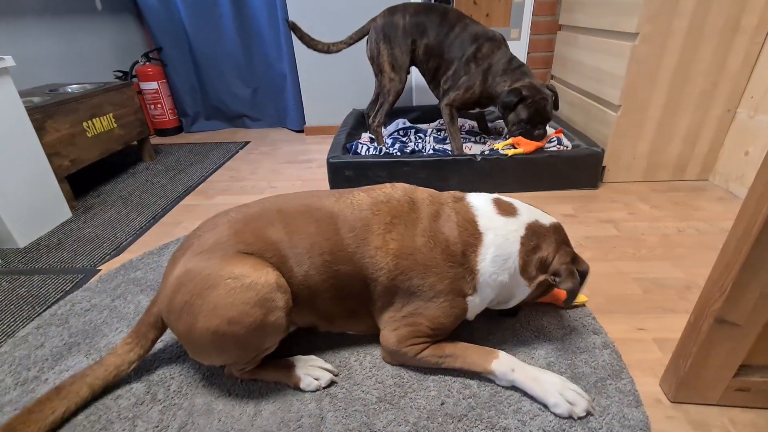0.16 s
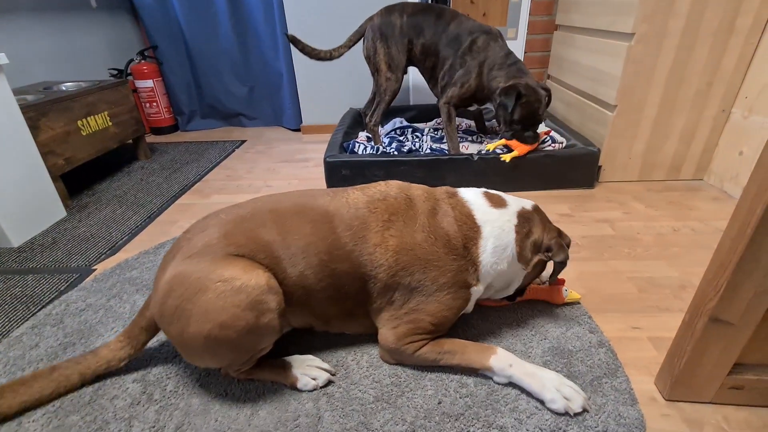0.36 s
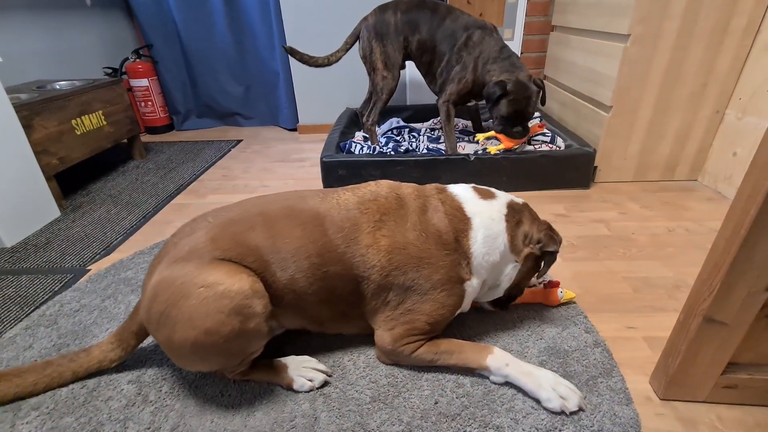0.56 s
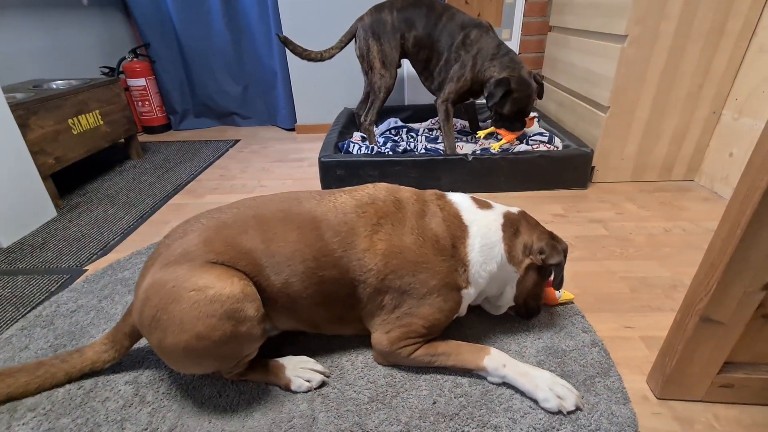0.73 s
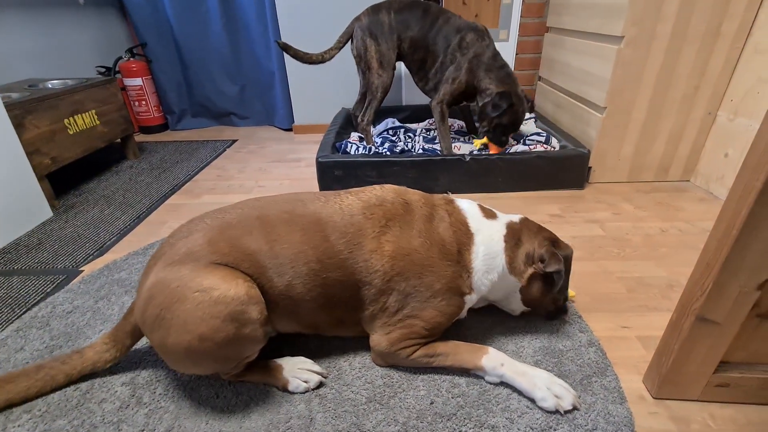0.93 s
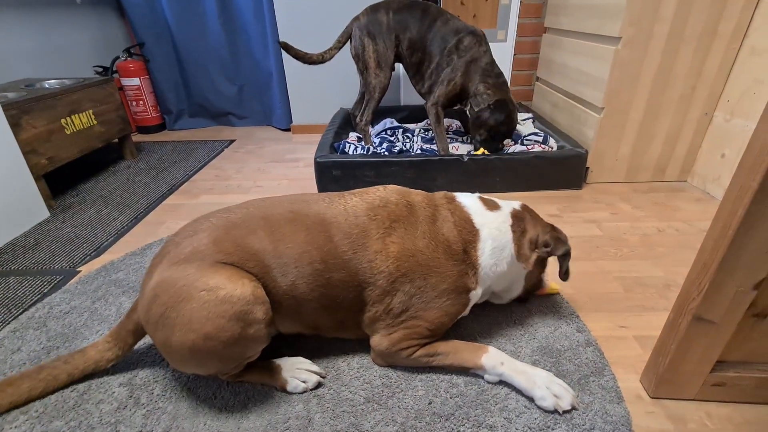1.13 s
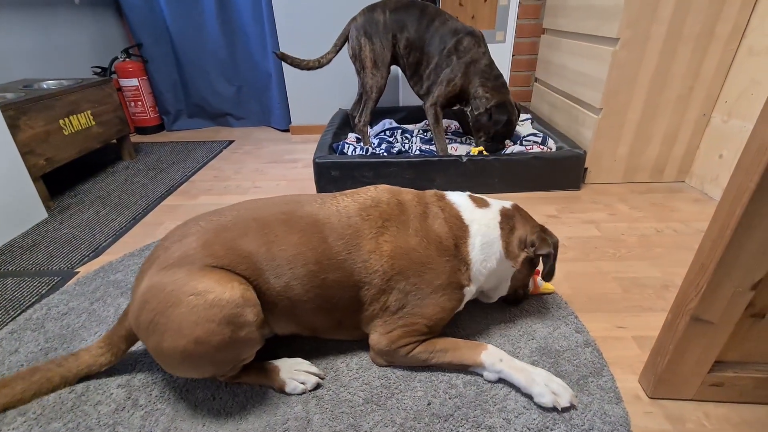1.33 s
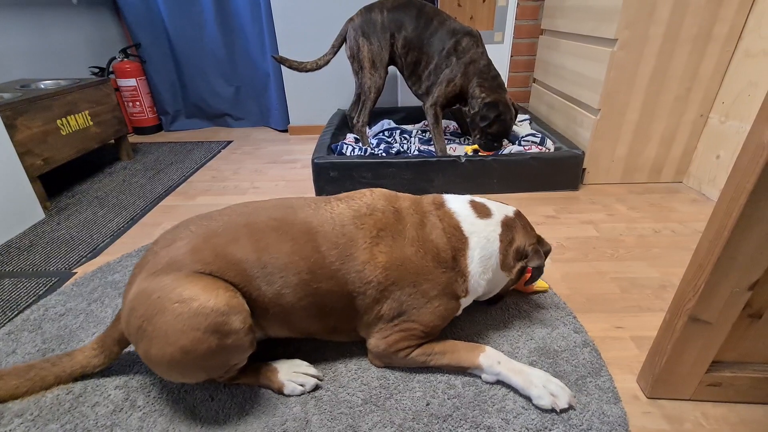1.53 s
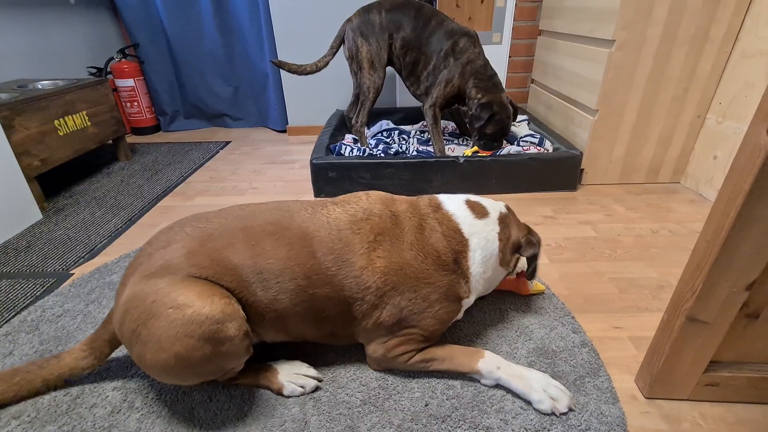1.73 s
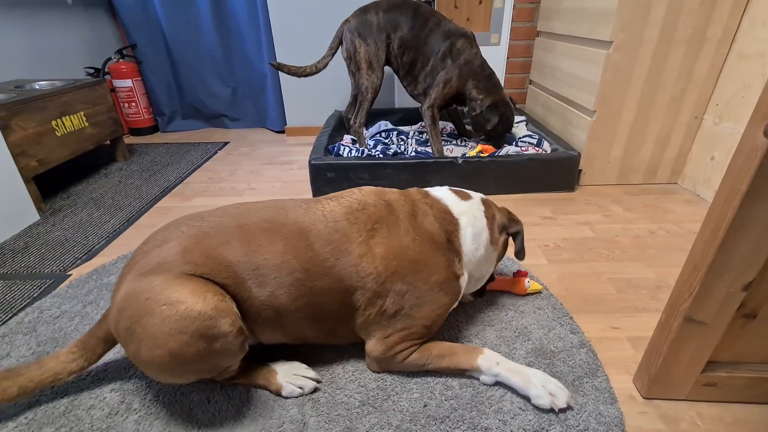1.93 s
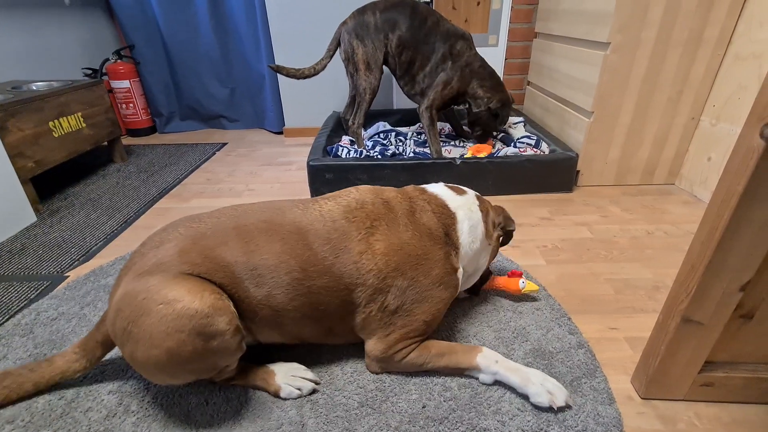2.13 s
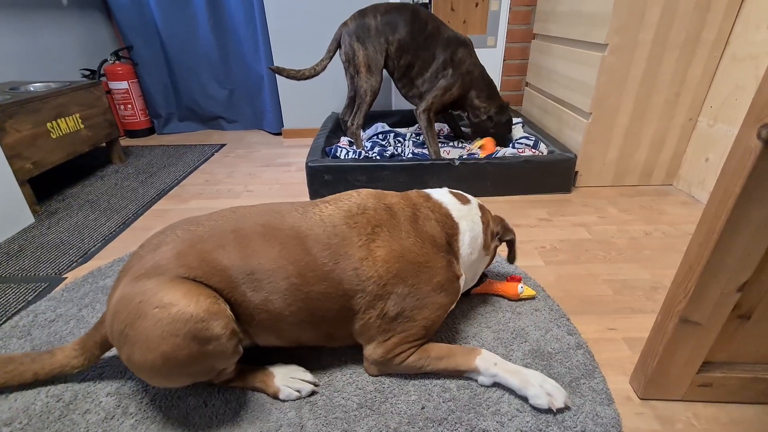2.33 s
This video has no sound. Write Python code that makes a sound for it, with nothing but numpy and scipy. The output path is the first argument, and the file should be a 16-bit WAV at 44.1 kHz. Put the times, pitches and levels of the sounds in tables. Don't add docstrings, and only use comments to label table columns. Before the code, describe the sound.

Squeaky rubber toys chewed by two dogs: a soft squeak, a loud shriek jumping registers, short dying squeaks, a second harder bite, then a faint indrawn squeak; low thumps and rubbing, close microphone, bare reverberant room.

```python
import sys
import numpy as np
from scipy import signal
from scipy.fft import rfft, irfft
from scipy.io import wavfile

SR = 44100
rng = np.random.default_rng(int(sys.argv[2]) if len(sys.argv) > 2 else 0)


def invert_db(level):
    return 10 ** (np.asarray(level, dtype=float) / 20)


def master_out(mix):
    frames = np.transpose(np.atleast_2d(mix))
    ceiling = np.clip(frames, -1, 1)
    pcm = np.round(ceiling * 32767).astype(np.int16)
    wavfile.write(sys.argv[1], SR, pcm)


N = 110250

# [t/s, f/Hz, level/dB]
SOFT_BITES = [
    [(.183, 1146, -30.5), (.225, 1171, -23.5), (.25, 1091, -32), (.272, 1022, -37.5)],
    [(1.048, 1116, -30), (1.068, 1082, -31), (1.088, 977, -38), (1.105, 1080, -56)],
    [(1.277, 1106, -40), (1.301, 1122, -36.5), (1.32, 1014, -45.5), (1.335, 950, -74)],
    [(1.959, 1121, -34.5), (1.983, 1118, -32), (2.0, 1109, -32), (2.011, 980, -46.5)],
]
REFILLS = [
    [(2.126, 1295, -46), (2.14, 1360, -28.5), (2.17, 1407, -29.5), (2.2, 1400, -25), (2.235, 1383, -29.5),
     (2.258, 1330, -29), (2.28, 1240, -38.5), (2.3, 1190, -48)],
    [(2.484, 1273, -57), (2.49, 1299, -39), (2.5, 1306, -39.5)],
]
# [t/s, f/Hz, level/dB]
BITE_1_RISE = [(.349, 1176, -37.5), (.362, 1225, -19.5), (.382, 1508, -21), (.396, 1599, -20.5),
               (.399, 1950, -18), (.413, 2355, -17), (.42, 2400, -19.5)]
BITE_1_SHRIEK = [(.42, 3253, -25.5), (.445, 3247, -24.5), (.458, 3750, -15.5), (.478, 3850, -18),
                 (.487, 4240, -22.5), (.506, 4215, -14.5), (.52, 4250, -13), (.535, 4430, -15.5),
                 (.558, 4540, -39.5)]
BITE_1_TOP = [(0.557, 5840, -33.5), (0.563, 6023, -27), (0.585, 5596, -23.5), (0.601, 5840, -27),
              (0.612, 5150, -24.5)]
BITE_1_DROP = [(.585, 4300, -31), (.596, 3400, -30), (.608, 2700, -30)]
BITE_1_SAG = [(0.611, 1870, -19), (0.627, 1738, -18.5), (0.64, 1525, -23), (.664, 1268, -26.5),
              (0.679, 1195, -28.5), (0.693, 1241, -22.5), (.712, 1521, -20.5), (0.719, 1607, -19)]
# [t/s, f/Hz, level/dB]
REBITE_CLIMB = [(0.722, 1900, -15), (.732, 1977, -18), (0.75, 2020, -27.5), (0.753, 2217, -16),
                (0.763, 2188, -22.5), (0.768, 1984, -17.5), (0.79, 2022, -20.5), (0.81, 2500, -18)]
REBITE_ARCH = [(.808, 3157, -18.5), (0.831, 3363, -23), (.865, 3383, -15.5), (0.88, 3093, -23.5),
               (0.886, 2795, -20.5), (0.895, 2671, -19.5), (0.902, 1437, -23.5), (.915, 1262, -20),
               (0.952, 1110, -40)]
# [t/s, f/Hz, level/dB]
BITE_2_RISE = [(1.398, 1140, -43), (1.418, 1214, -25.5), (1.433, 1378, -29), (1.447, 1616, -30),
               (1.466, 1550, -32)]
BITE_2_HOLD = [(1.464, 2100, -28), (1.484, 2001, -22), (1.505, 1980, -34.5), (1.521, 1994, -17.5),
               (1.533, 2143, -27), (1.547, 2370, -19)]
BITE_2_PEAK = [(1.547, 3237, -20.5), (1.561, 3117, -40), (1.569, 2997, -22.5)]
BITE_2_FALL = [(1.568, 1828, -23), (1.58, 1773, -26.5), (1.59, 1363, -25.5), (1.607, 1255, -29.5),
               (1.652, 1114, -36.5)]
LAST_ARCH = [(1.686, 1162, -29.5), (1.71, 1353, -25), (1.738, 1576, -23), (1.78, 1611, -23.5),
             (1.8, 1397, -25), (1.82, 1185, -32), (1.845, 1111, -43.5)]

# [f/Hz, level/dB]
NECK_PRESSED = [(1100, -4.5), (2000, -5), (3300, -5), (4500, 0), (5700, 2), (7300, -19), (10000, -5.5),
                (15000, -31)]
NECK_SOFT = [(1100, -8), (2200, -8.5), (3300, -4.5), (4500, 0), (5600, 3.5), (7300, -18.5), (9000, -8),
             (15000, -23)]
NECK_HIGH = [(2000, -4), (3300, -5), (4500, 3.5), (5900, 0.5), (7300, -15.5), (9000, -6), (12000, -14),
             (15000, -43)]
NECK_SLACK = [(1100, -10.5), (1800, -6.5), (3300, -6), (4500, -2), (5600, 3.5), (7300, -15), (10000, -5),
              (15000, -27)]
NECK_REFILL = [(1400, -3), (2800, -18), (4200, -23), (5500, -15.5), (7000, -28), (9500, -20.5),
               (15000, -31)]
# [f/Hz, level/dB]
AIR_COLOUR = [(1300, 0), (5500, 0), (8000, -14)]

# [t/s, peak level/dB, f/Hz]
BLOWS = [(0.14, -57, 166), (0.185, -37.5, 233), (0.343, -48, 154), (0.582, -51, 300), (0.619, -45, 240),
         (0.723, -37, 240), (0.797, -35, 281), (0.912, -44.5, 241), (1.031, -38.5, 301), (1.224, -41, 241),
         (1.359, -36.5, 237), (1.478, -38, 231), (1.537, -47, 260), (1.68, -50, 260), (1.722, -56, 229),
         (1.797, -28, 198), (2.004, -36, 220), (2.127, -36.5, 232), (2.286, -43, 195), (2.329, -42, 236),
         (2.399, -68, 223), (2.458, -42, 257),
         (0.051, -44.5, 840), (0.122, -41, 792), (0.188, -29.5, 366), (0.277, -47.5, 387),
          (0.49, -50.5, 710), (0.589, -42, 374), (0.716, -49, 355), (0.779, -42.5, 654), (0.8, -35.5, 353),
          (0.913, -54, 700), (1.018, -40.5, 360), (1.027, -40.5, 322), (1.248, -46, 438),
          (1.359, -46.5, 355), (1.463, -47, 754), (1.55, -42, 442), (1.67, -52, 610), (1.795, -32.5, 382),
          (1.887, -39.5, 545), (1.977, -52, 387), (1.994, -37, 406), (2.108, -46, 360), (2.124, -38, 703),
          (2.278, -49, 370), (2.42, -68.5, 776), (2.444, -46, 389), (2.458, -37, 439),
         (0.041, -39, 74), (0.191, -36, 106), (0.582, -40, 79), (0.625, -40, 63.4), (1.789, -30.5, 105),
         (1.868, -38.5, 285), (1.92, -42, 248), (1.915, -44.5, 570), (2.018, -32, 630), (2.035, -33.5, 487),
         (2.045, -35.5, 227), (2.19, -50, 71.4), (2.45, -46.5, 96)]
# [f/Hz, level/dB]
SNAPS = [
    (0.587, -15.5),
    (0.622, -26.5),
]
SNAP_COLOUR = [(60, -9.5), (500, -16.5), (3000, -1.5), (12000, -18)]
# [f/Hz, level/dB]
TICKS = [
    (.009, -44.5),
    (.123, -53),
    (1.249, -55),
]
TICK_COLOUR = [(500, -15.5), (1500, -9.5), (4000, -11.5), (7000, -48)]

# [f/Hz, level/dB per Hz]
CHEWING = [(0.0, -53.5), (.06, -48), (.105, -55.5), (.125, -53.5), (0.168, -46), (0.19, -39.5), (0.27, -55),
           (0.339, -43), (0.99, -63), (1.05, -43), (1.13, -59.5), (1.36, -54.5), (1.77, -59), (1.98, -54),
           (2.03, -58.5), (2.13, -48), (2.21, -62.5), (2.5, -54.5)]
RUSTLE_COLOUR = [(47, -1), (80, -1), (814, -6), (1080, -9.5), (1570, -14), (1930, -18.5), (4640, -28.5),
                 (7000, -43), (9100, -65.5), (15400, -120)]
# [f/Hz, level/dB]
HUM_COLOUR = [(12, -37), (20, -13.5), (162, -31), (242, 0.5), (400, -5.5), (520, -42), (880, -120)]

# [f/Hz, t60/s]
ROOM_T60 = [(200, 0.42), (1200, 0.26), (4000, 0.24), (7500, 0.23), (14000, 0.2)]
# [f/Hz, level/dB]
WALLS = [(30, 0), (6000, 0), (9000, -4), (16000, -5)]
# [f/Hz, phase/rad]
PORT_LEVEL = [(28, -12), (60, -6.5), (180, -1.5), (550, -1.7), (1300, -2), (2500, -3), (5000, -3),
              (9000, 0), (14000, 4.5)]
PORT_PHASE = [(800, 0), (1400, -2.4), (2200, -.6), (5300, -.6), (6300, -1.4), (8600, -2.4), (15000, -2.2)]

CUTOFF_HZ = 16200
STEADY, UNSTEADY, SLACK = .35, 2.1, 2.7
HALVES = np.array([[.5], [-.5]])


def at_hz(points, hz):
    table = np.array(points)
    return np.interp(np.log(hz), np.log(table[:, 0]), table[:, 1])


def rms_one(x):
    return x / np.sqrt(np.mean(x ** 2) + 1e-20)


def drift(rate_hz):
    r = np.exp(-2 * np.pi * rate_hz / SR)
    settle = 9000
    wander = signal.lfilter([1], [1, -2 * r, r * r], rng.standard_normal(N + settle))
    return rms_one(wander[settle:])


def colour(x, spectrum):
    hz = np.maximum(np.fft.rfftfreq(x.shape[-1], 1 / SR), 1)
    low_edge = np.minimum(1, hz / spectrum[0][0]) ** 3
    high_edge = np.minimum(1, spectrum[-1][0] / hz) ** 3
    return irfft(rfft(x) * invert_db(at_hz(spectrum, hz)) * low_edge * high_edge, x.shape[-1])


def reed(stretches, neck, rough):
    attack_s, release_s = .002, .004
    t, tones, flow = np.arange(N) / SR, np.zeros(N), np.zeros(N)
    wobble = 1 + rough * .003 * (drift(90) + .3 * drift(490))
    flutter = invert_db(rough * 1.5 * drift(170))
    k = np.arange(1, 15)[:, None]
    for rows in stretches:
        s, hz, db = np.transpose(rows)
        end_s = s[-1] + release_s
        on = slice(int(s[0] * SR), int(end_s * SR))
        u = t[on]
        pitch = np.interp(u, s, hz) * wobble[on]
        tilt_db = -1.5 * np.log2(k)
        gains = invert_db(at_hz(neck, k * pitch) + tilt_db) * (k * pitch < CUTOFF_HZ)
        phase = k * 2 * np.pi * np.cumsum(pitch) / SR + rng.uniform(0, 2 * np.pi, k.shape)
        tone = np.sum(gains * np.cos(phase), axis=0)
        tone /= np.sqrt(np.sum(gains ** 2, axis=0) / 2)
        ramp = np.minimum((u - s[0]) / attack_s, (end_s - u) / release_s)
        shape = invert_db(np.interp(u, s, db)) * np.clip(ramp, 0, 1)
        tones[on] += tone * shape * flutter[on]
        flow[on] += shape
    air = rms_one(colour(colour(rng.standard_normal(N), neck), AIR_COLOUR))
    return tones + invert_db(-33) * rough ** 3 * flow * air


def squeaks():
    soft = reed(SOFT_BITES, NECK_SOFT, rough=STEADY * 1.3)
    arch = reed([LAST_ARCH], NECK_PRESSED, rough=STEADY * 1.22)
    rises = reed([BITE_1_RISE, BITE_2_RISE], NECK_PRESSED, rough=UNSTEADY)
    high_stretches = [BITE_1_SHRIEK, BITE_1_TOP, REBITE_CLIMB, REBITE_ARCH, BITE_2_HOLD, BITE_2_PEAK]
    high = reed(high_stretches, NECK_HIGH, rough=STEADY * 1.3)
    falls = reed([BITE_1_DROP, BITE_1_SAG, BITE_2_FALL], NECK_SLACK, rough=SLACK)
    return soft + arch + rises + high + falls


def refills():
    return reed(REFILLS, NECK_REFILL, rough=STEADY / 2)


def blows():
    out, u = np.zeros(N + SR), np.arange(SR // 4) / SR
    dull = signal.butter(4, 500, fs=SR, output="sos")
    for s, db, hz in BLOWS:
        puff = invert_db(-9) * rms_one(signal.sosfilt(dull, rng.standard_normal(len(u))))
        t60_s = .055 + 9.0 / (hz + 100)
        onset = np.minimum(u / 0.0022, 1)
        i = int(s * SR)
        out[i:i + len(u)] += (np.sin(2 * np.pi * hz * u) + puff) * invert_db(db - 1.0 - 60 * u / t60_s) * onset
    burst_t60_s = 0.093
    for events, spectrum in ((SNAPS, SNAP_COLOUR), (TICKS, TICK_COLOUR)):
        for s, db in events:
            burst = rms_one(colour(rng.standard_normal(len(u)), spectrum))
            i = int(s * SR)
            out[i:i + len(u)] += burst * invert_db(db - 10.0 - 60 * u / burst_t60_s)
    return out[:N]


def spread(mid):
    return mid + .45 * rng.standard_normal(N) * [[1], [-1]]


def chewing():
    rubs_per_s, rub_share, lumpy_db = 900, .35, 3
    sizes = invert_db(4.8 * np.minimum(rng.exponential(1, N), 4)) * rng.choice([-1, 1], N)
    chance = rubs_per_s * invert_db(5.0 * drift(12)) / SR
    rubs = rms_one(sizes * (rng.random(N) < chance))
    mid = rub_share * rubs + (1 - rub_share) * rng.standard_normal(N)
    rustle = rms_one(colour(spread(mid), RUSTLE_COLOUR))
    s, db = np.transpose(CHEWING)
    return rustle * invert_db(np.interp(np.arange(N) / SR, s, db) + lumpy_db * drift(32))


def house_rumble():
    return invert_db(-61) * rms_one(colour(spread(rng.standard_normal(N)), HUM_COLOUR))


def room():
    first_echo_s = .003
    u, edges, out = np.arange(SR * 3 // 4) / SR, 40 * 2 ** np.arange(0, 9, .5), 0
    white = rng.standard_normal((2, len(u))) * (u > first_echo_s)
    for low, high in zip(edges, edges[1:]):
        band = signal.sosfilt(signal.butter(2, [low, high], "band", fs=SR, output="sos"), white)
        out = out + band * invert_db(-60 * u / at_hz(ROOM_T60, np.sqrt(low * high)))
    return out / np.sqrt(np.sum(out ** 2) / 2)


def scene():
    out_squeaks, in_squeaks, low_blows = squeaks(), refills(), blows()
    sent = invert_db(2) * out_squeaks + invert_db(-2) * in_squeaks + invert_db(-10) * low_blows
    wet = signal.fftconvolve(colour(sent, WALLS)[None], room(), axes=1)[:, :N]
    panned = in_squeaks * invert_db(4.5 * HALVES)
    direct = invert_db(-4.5) * out_squeaks + panned + low_blows
    return direct + invert_db(-3.5) * wet + chewing() + house_rumble()


def band_limit(x):
    return signal.sosfilt(signal.butter(12, 15710, fs=SR, output="sos"), x)


def record(dry):
    hz = np.maximum(np.fft.rfftfreq(N, 1 / SR), 1)
    level = invert_db(at_hz(PORT_LEVEL, hz) * HALVES)
    turn = np.exp(1j * at_hz(PORT_PHASE, hz) * HALVES)
    heard = irfft(rfft(dry) * level * turn, N)
    top_cut = signal.cheby2(12, 70, CUTOFF_HZ, fs=SR, output="sos")
    return band_limit(signal.sosfilt(top_cut, heard))


dry = scene()
out = record(dry)
master_out(out)
```